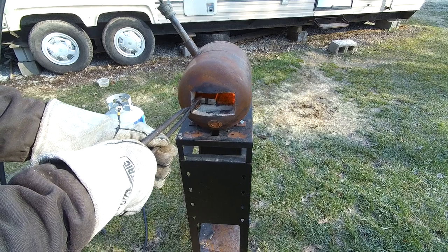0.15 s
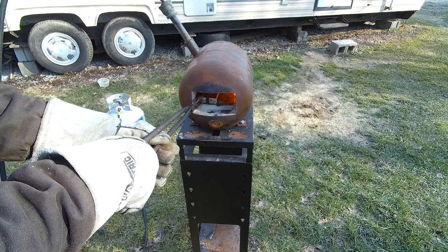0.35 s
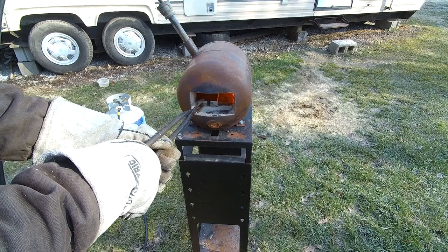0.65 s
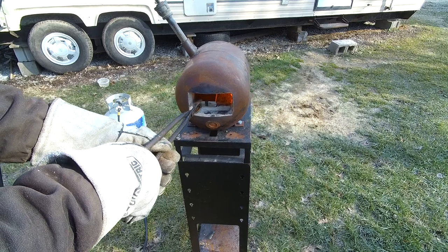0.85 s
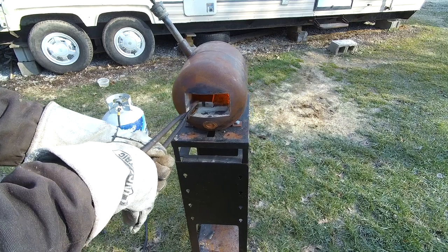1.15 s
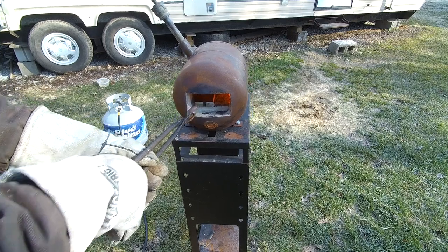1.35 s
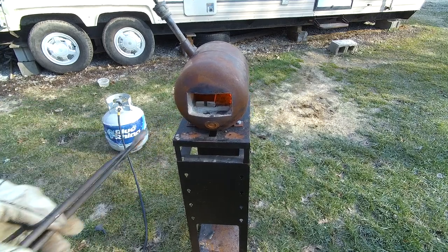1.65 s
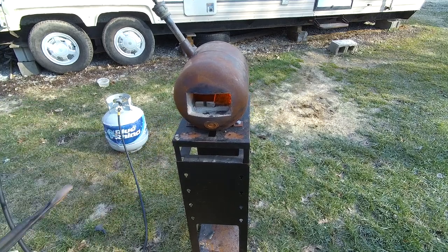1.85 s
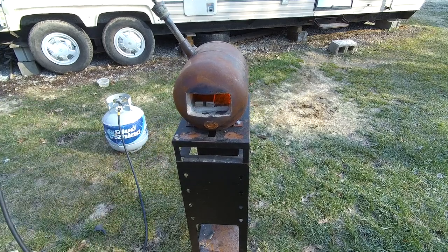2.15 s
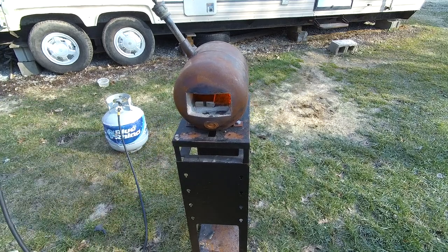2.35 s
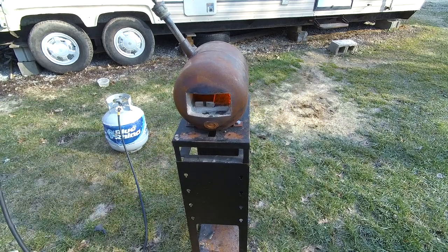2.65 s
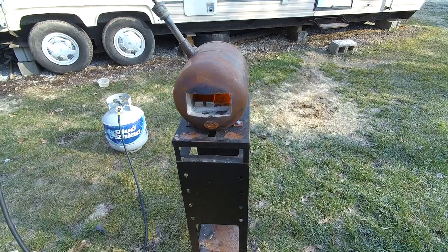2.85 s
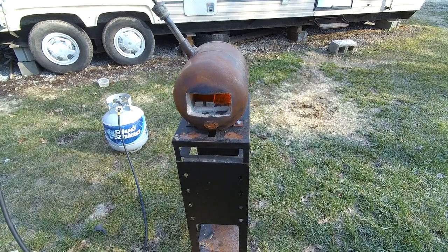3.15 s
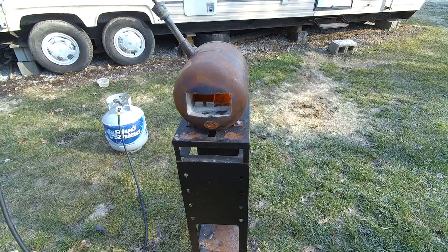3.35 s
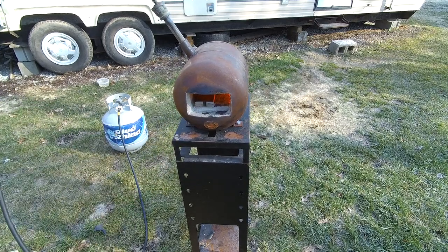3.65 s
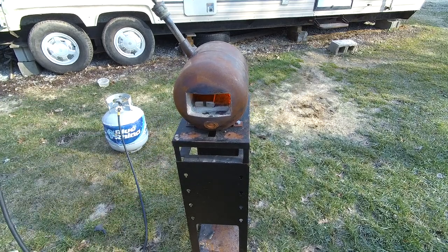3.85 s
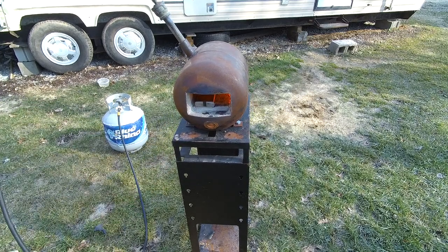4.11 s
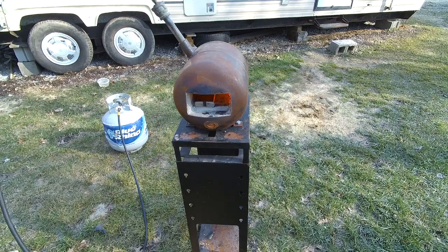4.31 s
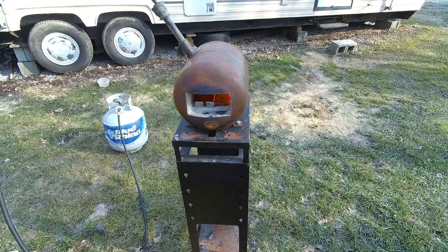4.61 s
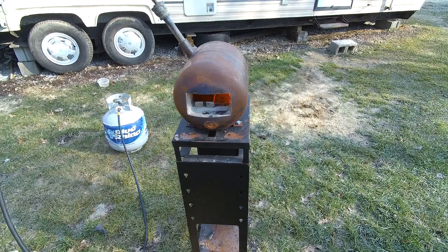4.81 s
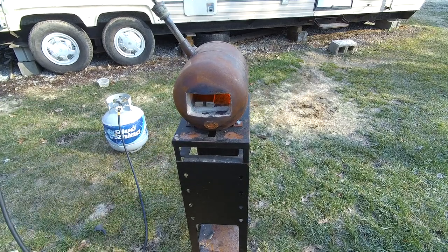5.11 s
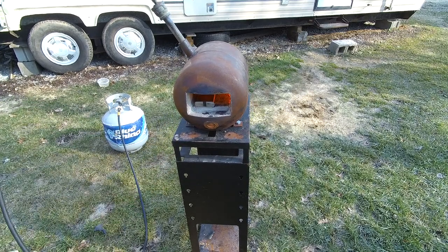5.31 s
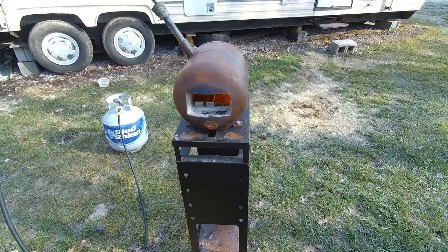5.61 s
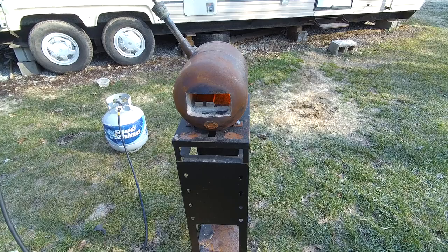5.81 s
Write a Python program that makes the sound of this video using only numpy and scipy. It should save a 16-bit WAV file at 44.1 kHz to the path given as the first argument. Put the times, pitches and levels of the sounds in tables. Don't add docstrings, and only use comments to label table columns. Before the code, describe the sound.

From 0 s a gas forge is already roaring outdoors, a few paces from a handheld microphone. The roar is loud, dense and throaty, strongest in the low mids at roughly 150 to 650 Hz, rough with igniting gas pockets and constantly flickering in level and pitch colour. Above it, much quieter, are a breathy flame rush and a thin jet hiss, fluttering and surging in tiny puffs. A firmer push comes near 1.05 s. Until about 2 s, close sleeves give a slightly hollow, phasey colour, which shifts at 1.7 to 2.2 s as they withdraw; then the sound is more open. The roar holds steady with short dips and flares, while the hiss grows slightly, fullest near 4.9 s. Low breeze rumble swells at about 0.35, 2.4, 2.9 and most at 4.8 s. A short grass reflection colours everything, without a reverberant tail. It ends abruptly at 6 s, still burning.

```python
import sys
import numpy as np
from scipy import signal
from scipy.fft import rfft, irfft, next_fast_len
from scipy.io import wavfile
from scipy.ndimage import uniform_filter1d, minimum_filter1d, map_coordinates

SR = 44100
rng = np.random.default_rng(int(sys.argv[2]) if len(sys.argv) > 2 else 0)


def to_wav(s):
    ch = np.atleast_2d(s).T
    pcm = np.round(np.clip(ch, -1, 1) * 32767)
    wavfile.write(sys.argv[1], SR, pcm.astype(np.int16))


def invert_db(level):
    return 10 ** (np.asarray(level, dtype=float) / 20)


N = 263277

# t/s, level/dB
ROAR_LEVEL = [(0.0, -10), (0.08, -13.5), (1.03, -12.5), (1.06, -11), (1.28, -13), (1.73, -13), (1.86, -15),
              (2.06, -13), (4.77, -14), (4.82, -13), (5.9, -13), (5.97, -13)]
# f/Hz, level/dB
ROAR_SPECTRUM = [(35, -46.5), (60, -16), (108, -8), (178, 1), (226, 0), (292, -5), (377, 0.5), (413, -3.5),
                 (459, -2.5), (640, -5.5), (725, -13.5), (775, -9.5), (850, -15.5), (910, -18.5),
                 (1070, -24), (1400, -33), (2200, -51.5), (2860, -81), (4840, -120)]
# t/s, change/dB, half width/s
FLARES = [(.06, -0.5, 0.012), (.11, -2, 0.021), (.68, -0.5, 0.061), (.75, 0, 0.027), (.88, 0.5, 0.027),
          (.95, -2, 0.037), (1.23, -4, 0.015), (1.41, -2.5, 0.032), (1.7, 2.5, 0.055), (1.88, 0, 0.015),
          (2.1, 2, 0.034), (2.45, -1.5, 0.039), (2.66, -3, 0.016), (3.23, -3, 0.028), (3.37, 0.5, 0.035),
          (3.47, -2.5, 0.074), (3.75, 1, 0.062), (3.8, -2.5, 0.036), (4.26, 1, 0.034), (4.55, -1.5, 0.053),
          (4.87, 0.5, 0.025), (5.18, -1, 0.027), (5.37, -2, 0.034), (5.64, 1.5, 0.033), (5.71, -2, 0.084),
          (5.85, -1, 0.045)]
# t/s, change/dB
CLUMPS = [(.2, 0.5), (.33, 2.5), (.49, 4), (.66, 2), (.72, 2), (.85, -1.5), (1.17, -3), (1.27, 2),
          (1.44, 1), (1.59, 1), (1.76, 3), (1.82, 1), (1.98, -2), (2.03, 2.5), (2.24, 2), (2.36, -2),
          (2.62, 0.5), (2.71, -0.5), (2.79, -0.5), (3.14, 0.5), (3.3, 0), (3.88, -3), (3.94, -2),
          (4.15, -1), (4.32, 0), (4.45, 3), (4.66, 2), (4.73, 0), (4.82, 0.5), (4.95, -2), (5.02, 2),
          (5.13, 0.5), (5.55, -2), (5.67, -2), (5.81, 3), (5.89, -3)]
# t/s, f/Hz, change/dB, half width/s
CATCHES = [(0.0, 101.5, 6, 0.06), (0.0, 241, -6.5, 0.042), (0.0, 643, -0.5, 0.06), (0.2, 1100, -6, 0.056),
           (0.24, 368, 3, 0.059), (0.51, 296, -6.5, 0.046), (1.04, 240, 3.5, 0.042),
           (1.29, 188, -4.5, 0.06), (1.29, 1080, -5, 0.06), (1.53, 420, -5, 0.06), (1.7, 139, -1.5, 0.06),
           (1.75, 590, -4.5, 0.18), (1.85, 980, 4, 0.052), (1.87, 130, 5.5, 0.081), (2.0, 200, 1.5, 0.09),
           (2.04, 497, -6, 0.069), (2.05, 129, 2, 0.038), (2.15, 640, 1.5, 0.09), (2.29, 245, -6, 0.09),
           (2.41, 316, 4, 0.083), (2.42, 153, -6, 0.09), (2.59, 150, -6.5, 0.049), (2.61, 260, 4, 0.16),
           (2.61, 1110, -2.5, 0.083), (2.71, 584, -4, 0.049), (2.75, 130, 5, 0.041), (3.03, 130, 1.5, 0.15),
           (3.16, 590, -3, 0.049), (3.24, 900, 5, 0.043), (3.26, 100, 9.5, 0.06), (3.35, 230, 3.5, 0.06),
           (3.42, 120, 6, 0.09), (3.56, 300, 2.0, 0.18), (3.77, 100, -3.5, 0.06), (3.95, 480, 2.0, 0.051),
           (4.02, 900, -3.5, 0.06), (4.32, 100, -9, 0.06), (4.35, 330, -1.5, 0.069), (4.35, 780, -4, 0.09),
           (4.68, 320, -3.5, 0.14), (4.76, 730, 2, 0.09), (5.05, 120, -1.5, 0.09), (5.21, 140, 6, 0.06),
           (5.34, 287, -4.5, 0.06), (5.42, 129, -4.0, 0.1), (5.57, 340, 5.5, 0.042), (5.63, 100, -8, 0.042),
           (5.82, 844, 2.5, 0.1), (5.97, 153, -9, 0.041), (5.97, 262, 4.5, 0.09),
           (.68, 240, 6, 0.1), (1.1, 370, -1.5, 0.038), (1.05, 80, 9.5, .06), (0.41, 60, 1.5, .06),
                (1.8, 90, -1.5, .07), (1.75, 110, -6, .05), (2.3, 82, 0.5, .07), (3.0, 79, 0, .07),
                (3.85, 97, 0, .12), (3.7, 90, -2, .1), (6, 110, -2.5, .07), (7.3, 560, -3.5, 0.089),
                (2.08, 1000, -2, 0.094), (1.7, 200, 5, 0.068), (3, 820, 3, .04), (2.27, 400, 1.5, .08),
                (2.93, 260, 2, 0.092), (.03, 200, 2.5, 0.098), (.87, 540, -2.5, .03), (2.5, 780, -1.5, .04),
                (4.8, 650, 2, 0.13), (5.65, 270, 0, 0.097), (1.45, 81, 3.5, .05), (2.2, 580, 0, .2),
                (2.62, 99, 7.5, 0.12), (4.2, 120, 8.5, 0.077), (4.88, 510, 0, 0.61), (5.75, 650, 2.5, .12),
                (5.8, 90, 4.5, 0.092), (5.5, 1150, 1, 0.097), (.2, 1800, 6, 0.32)]
# t/s, level/dB
GAS_FLOW = [(0, -1), (.12, -2), (.55, -1), (.88, -1), (1.1, 0), (1.3, -5.5), (1.47, -1.5), (1.6, -2),
            (1.85, -1), (2.1, 0.5), (2.6, -0.5), (3.1, 1.5), (3.45, -1), (3.7, 2), (4.4, 1), (4.9, 3.5),
            (5.2, 0.5), (5.97, 2)]
# t/s, surge/dB, share reaching the flame tongue/1
GAS_PUFFS = [(.21, 0, .3), (.42, 3.5, 0.29), (.5, 5.5, 0.39), (.59, 6.5, .2), (.72, 4, 0.65),
             (.98, 1.5, .8), (1.37, 2, .5), (1.5, 1.5, 1.7), (1.69, 5, 0.89), (2.1, 2.5, 1.4),
             (2.22, 2, 0.27), (2.32, 1, 0.36), (2.46, -3.5, .2), (2.58, 3.5, 0.83), (2.79, 3.5, 0.5),
             (3.0, 1.5, 0.89), (3.22, 1, 0.41), (3.39, 5, 0.3), (3.71, 2.5, 0.75), (3.98, 1.5, 0.28),
             (4.2, 4.5, .7), (4.77, 2, 1.3), (5.04, 2, 0.93), (5.21, 1.5, .9), (5.3, 3, .7),
             (5.39, 3.5, .4), (5.45, 2.5, 0.73), (5.61, 2, 0.78), (5.74, 2.5, .5), (5.8, 2.5, 1.2)]
# t/s, change/dB, share reaching the flame tongue/1
GAS_LULLS = [(.07, -2.5, 1), (.31, -1.5, 0.065), (1.43, 0, 1.2), (1.8, -3, 0.013), (2.68, -1.5, 1.7),
             (3.46, -0.5, 1), (3.79, -4, 0.4), (4.14, -3.5, 0.39), (4.63, -1, .3), (4.91, -3.5, 0.76),
             (5.15, -1, 1), (5.49, -4.5, 0.59), (5.66, -1.5, 1.3)]
# f/Hz, level/dB
TONGUE_SPECTRUM = [(880, -29), (1500, 0), (1710, 0.5), (2450, -8), (3260, -7), (3600, -9.5), (4900, -16.5),
                   (5300, -23), (5900, -27), (7280, -45.5), (12300, -120)]
# t/s, change/dB
TONGUE_LEAPS = [(.33, 1), (.6, -1.5), (1.13, -1.5), (1.72, 1), (2.11, 2), (.8, -2.5), (1.25, 1),
                (1.4, -1.5), (2.99, 0.5), (3.35, 3), (3.92, 0.5), (5.1, 3), (5.8, 0.5), (2.85, 1.5),
                (2.97, 1.5), (2.08, 0), (1.69, -0.5), (4.72, 1.5), (4.83, 1), (.03, 1), (1.5, 1.5),
                (3.11, -2), (3.39, -2.5), (3.84, -1), (4.27, 2.5), (4.37, -0.5), (4.63, 0), (4.95, -1),
                (5.24, -2), (5.37, -2)]
# f/Hz, level/dB
HISS_SPECTRUM = [(2800, -29), (4800, -4.5), (5500, -5), (6700, -1.5), (7080, -2.5), (7650, -6.5),
                 (8600, -7.5), (10500, -39.5)]
# f/Hz, level/dB
AIR_SPECTRUM = [(6500, -38), (8600, -4), (9800, -0.5), (11700, -5.5), (12800, -8), (13700, -8), (14300, -9),
                (15100, -9)]
# f/Hz, level/dB
FAR_SPECTRUM = [(10000, -30.5), (12000, -5), (13500, 1.5), (15100, -2.5)]
# t/s, hiss change/dB, air change/dB
JET_SPITS = [(2.63, 0, 2), (2.8, 1, 1.5), (2.92, 3, 2), (2.99, 1, 3), (3.4, 1, 1.5), (.02, 1, 2.5),
             (.06, 2, 5), (.18, 5, 2), (.23, 0, 6.5), (.5, 1, 1), (.82, 0, 1), (.92, 1, 2.5), (1.97, 0, 2),
             (2.28, 1, 2), (2.72, 1, 2), (3.45, -1, 2), (3.6, 0, 1), (3.72, 0, -1), (4.34, 1, 3),
             (4.59, 4, 3), (4.72, -1, -2), (4.96, 0, 0), (5.05, 1.5, 1), (5.45, 2, 2), (5.76, 0.5, 0),
             (.27, 3, 0.5), (.37, 1, 0), (.59, -1, -1.5), (.68, 2, -2.5), (.77, 1, 3), (.87, -5, 0),
             (1.0, -1, 3), (1.15, 2.5, -2), (1.36, 4, 3.5), (1.45, -1, -6), (1.63, 4, 3), (1.85, -4, 2),
             (1.91, -4, -2), (2.34, 3, 4.5), (2.455, 6, 6.5), (3.08, -4, 3), (3.22, 2, 2.5), (3.54, 0.5, 3),
             (3.68, -1.5, 2), (3.89, 3, 4), (3.98, -1, 4), (4.115, 3, 4), (4.27, 0, 4.5), (4.41, 0, 5.5),
             (4.64, -2, -5), (4.8, -3, -2.5), (4.89, 1, 1), (5.01, -3, 1), (5.15, -1, 2.5), (5.23, 1, -1),
             (5.35, -1, -3.5), (5.67, -1, 4.5), (5.89, -2, -2.5)]
# t/s, delay/ms
GRASS_PATH = [(0, 4.885), (1.95, 4.885), (2.3, 4.83), (3.5, 4.81), (4.1, 4.77), (6, 4.77)]
# f/Hz, level/dB
GRASS_REFLECTION = [(100, -18.5), (800, -15.5), (1500, -14), (2100, -8.5), (2700, -7.5), (3600, -9),
                    (4700, -13), (5600, -21), (15000, -36.5)]
# t/s, echo level/dB, screened share/1
SLEEVES = [
    (0, -9, .15),
    (.7, -9, .15),
    (1.2, -8.5, .2),
    (1.6, -6, .15),
    (1.84, -6.5, .14),
    (1.96, -7, 0),
    (2.1, -10, 0),
    (2.25, -30, 0),
    (6, -60, 0),
]
# f/Hz, level/dB
SLEEVE_REFLECTION = [(300, -30.5), (700, -15), (1600, 2), (2200, -3.5), (3200, -2.5), (4500, -1.5),
                     (7000, -11), (15000, -18)]
# f/Hz, level/dB
SLEEVE_SHADOW = [(400, -18), (750, 8), (1300, 0.5), (5000, -21.5), (15000, -14)]
# t/s, delay/ms
SLEEVE_PATH = [(0, .9), (1.4, .9), (1.7, 1.0), (1.9, 1.23), (2.02, 1.7), (2.15, 2.3), (6, 2.3)]
# f/Hz, level/dB
BREEZE_SPECTRUM = [(11, -29.5), (22, -7), (43, 7.5), (70, 0), (90, 4), (120, -32.5), (200, -120)]
# t/s, swell/dB, half width/s
BREEZE_GUSTS = [
    (.35, 10, 0.11),
    (.65, 6, .12),
    (1.5, 6, 0.13),
    (1.98, 10, 0.088),
    (2.38, 11, .15),
    (2.92, 11, 0.17),
    (3.3, 11, 0.093),
    (4.18, 7.5, 0.27),
    (4.82, 13, 0.4),
    (5.7, 8, 0.36),
]

PUFF_RISE_S, PUFF_FALL_S = 0.026, 0.022
SPIT_S, CLUMP_S = 0.016, 0.012
CATCH_OCTAVES = 0.25
TONGUE_DB, HISS_DB, AIR_DB, FAR_DB = -46, -61.5, -61.5, -67.5
TONGUE_FOLLOWS = 0.8
CALM_DB = -43
BEND = 0.26


def burner():
    roar = chamber_roar()
    (level_db,) = curves(ROAR_LEVEL)
    flare_s, flare_db, width_s = np.transpose(FLARES)
    level_db = level_db + swells(flare_s, flare_db, width_s, width_s)
    level_db = level_db + swells(*np.transpose(CLUMPS), CLUMP_S, CLUMP_S)
    level_db = level_db + 0.24 * wobble(6.7)
    return invert_db(level_db) * roar + gas_jet() * invert_db(-0.7 * roar)


def chamber_roar():
    kicks = 0.31 * pockets(220, spread_db=2.0)
    return singing(rush(ROAR_SPECTRUM, patchy_db=1.0, kicks=kicks))


def pockets(rate, spread_db):
    when, size = rng.random((2, N))
    kick = invert_db(-spread_db * np.log(size + 1e-9))
    return -unit((when < rate / SR) * kick)


def singing(roar):
    when, pitch_hz, change_db, width_s = np.transpose(CATCHES)
    hz, s, z = signal.stft(roar, SR, nperseg=2048)
    near = np.exp(-(np.log2((hz[:, None] + 1) / pitch_hz) / CATCH_OCTAVES) ** 2)
    now = np.exp(-((s - when[:, None]) / width_s[:, None]) ** 2)
    return signal.istft(z * invert_db((near * change_db) @ now), SR, nperseg=2048)[1][:N]


def gas_jet():
    (flow_db,) = curves(GAS_FLOW)
    when, surge_db, share = np.transpose(GAS_PUFFS + GAS_LULLS)
    spit_s, spit_hiss_db, spit_air_db = np.transpose(JET_SPITS)
    jet_db = flow_db + puffs(when, surge_db)

    tongue_db = TONGUE_DB + TONGUE_FOLLOWS * flow_db + puffs(when, share * surge_db)
    tongue_db = tongue_db + puffs(*np.transpose(TONGUE_LEAPS)) + 0.74 * flutter()
    tongue = invert_db(tongue_db) * rush(TONGUE_SPECTRUM, patchy_db=0.7)

    hiss_db = HISS_DB + jet_db + puffs(spit_s, spit_hiss_db) + flutter()
    hiss = invert_db(hiss_db) * rush(HISS_SPECTRUM, patchy_db=1.5)

    air_db = AIR_DB + jet_db + swells(spit_s, spit_air_db, SPIT_S, SPIT_S)
    air_db = air_db + flutter() + 0.3 * wobble(22)
    air = invert_db(air_db) * rush(AIR_SPECTRUM, patchy_db=2.5)
    far_edge = invert_db(FAR_DB + flow_db) * rush(FAR_SPECTRUM, patchy_db=0.0)
    return tongue + hiss + air + far_edge


def puffs(when, size_db):
    return swells(when, size_db, PUFF_RISE_S, PUFF_FALL_S)


def flutter():
    return 0.6 * wobble(30) + 0.8 * wobble(120)


def surroundings(forge):
    return past_sleeves(over_grass(forge))


def over_grass(x):
    return x + delayed(coloured(x, GRASS_REFLECTION, lag=0.9), *curves(GRASS_PATH))


def past_sleeves(x):
    echo_db, screened = curves(SLEEVES)
    x = x - screened * coloured(x, SLEEVE_SHADOW)
    return x - invert_db(echo_db) * delayed(coloured(x, SLEEVE_REFLECTION), *curves(SLEEVE_PATH))


def breeze():
    when, swell_db, width_s = np.transpose(BREEZE_GUSTS)
    level_db = CALM_DB + swells(when, swell_db, width_s, width_s) + 1.2 * wobble(9.3)
    return invert_db(level_db) * rush(BREEZE_SPECTRUM, patchy_db=-1.5)


def rush(spectrum, patchy_db, kicks=0):
    z = signal.stft(rng.standard_normal(N + 512), nperseg=512)[2]
    field = uniform_filter1d(rng.standard_normal(z.shape), size=8, axis=0)
    field = uniform_filter1d(field, size=8, axis=1)
    noise = signal.istft(z * invert_db(patchy_db * unit(field)), nperseg=512)[1][:N]
    return unit(coloured(noise + kicks, spectrum))


def swells(when, size_db, rise_s, fall_s):
    coarse = np.arange(0, N, 32)
    t = coarse[:, None] / SR - when
    bells = np.exp(-(t / np.where(t < 0, rise_s, fall_s)) ** 2)
    return np.interp(np.arange(N), coarse, bells @ size_db)


def wobble(rate):
    return map_coordinates(rng.standard_normal(N // 100), [np.arange(N) * rate / SR])


def delayed(x, delay_ms):
    return map_coordinates(x, [np.arange(N) - delay_ms * SR / 1000], mode="mirror")


def coloured(x, points, lag=0):
    m = next_fast_len(N + 8192)
    gain = invert_db(along(points, np.fft.rfftfreq(m, 1 / SR)))
    return irfft(rfft(x, m) * gain * np.exp(1j * lag), m)[:N]


def along(points, hz):
    f, v = np.transpose(points)
    return np.interp(np.log(hz + 1), np.log(f + 1), v)


def curves(rows):
    s, *cols = np.transpose(rows)
    return [np.interp(np.arange(N) / SR, s, c) for c in cols]


def unit(x):
    return x / np.sqrt(np.mean(x ** 2) + 1e-20)


def scene():
    return (surroundings(burner()) + breeze())[None]


def band_limit(x):
    return signal.sosfilt(signal.butter(12, 14980, fs=SR, output="sos"), x)


def record(dry):
    bend_spectrum = [(40, -24.5), (150, -14.0), (600, -2.5), (1100, -19.0), (15000, -29.5)]  # f/Hz, level/dB
    x = dry[0] - BEND * coloured(dry[0] ** 2, bend_spectrum)
    needed = np.minimum(1, 0.93 / (np.abs(x) + 1e-9))
    x = x * uniform_filter1d(minimum_filter1d(needed, size=883), size=881)
    x = x * np.minimum(1, (N + 12 - np.arange(N)) / 44)
    return band_limit(x[None])


dry = scene()
out = record(dry)
to_wav(out)
```